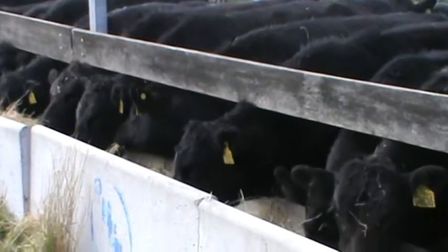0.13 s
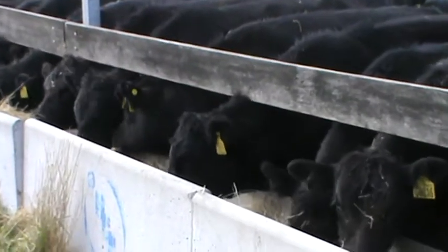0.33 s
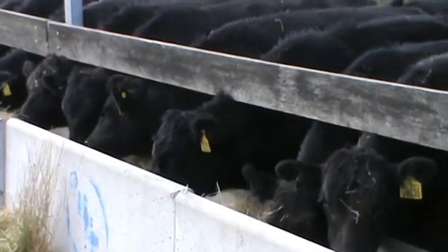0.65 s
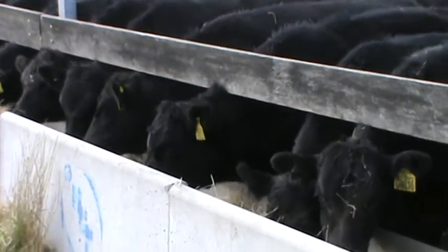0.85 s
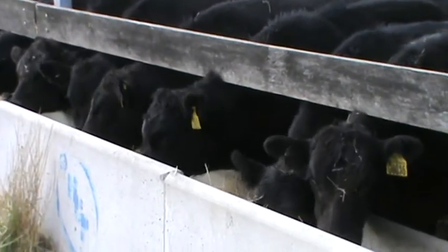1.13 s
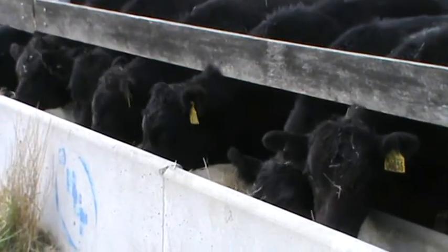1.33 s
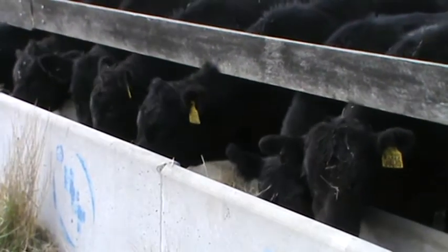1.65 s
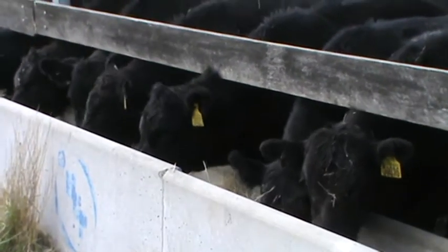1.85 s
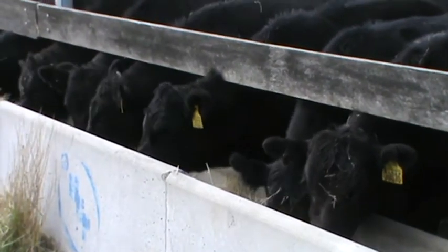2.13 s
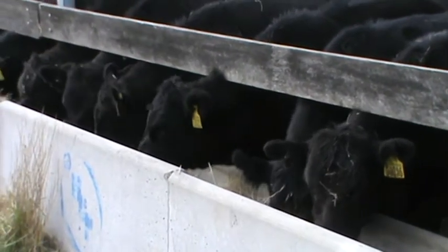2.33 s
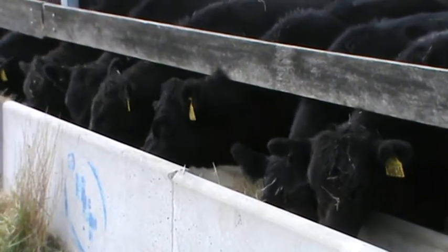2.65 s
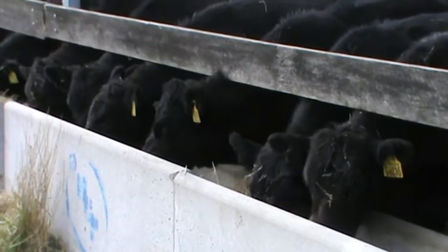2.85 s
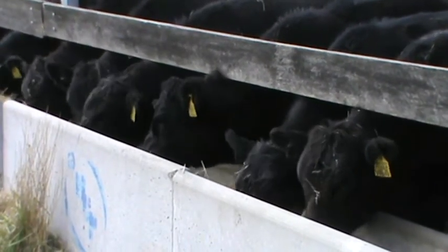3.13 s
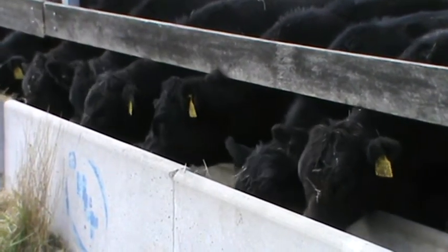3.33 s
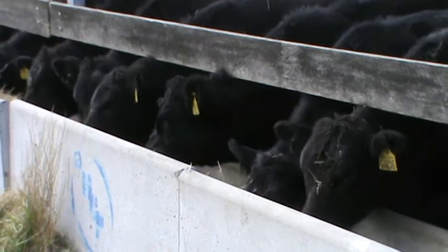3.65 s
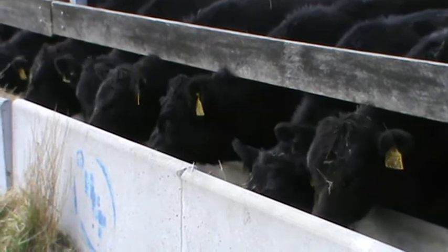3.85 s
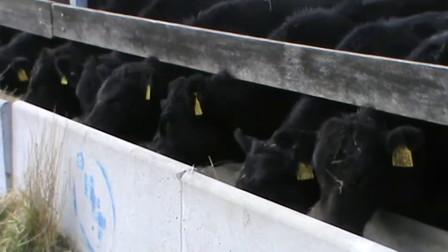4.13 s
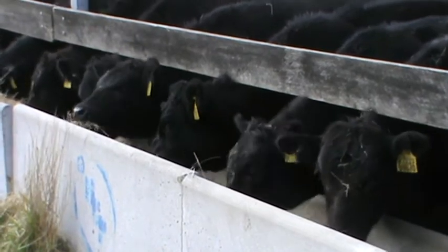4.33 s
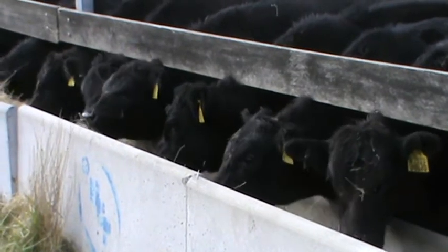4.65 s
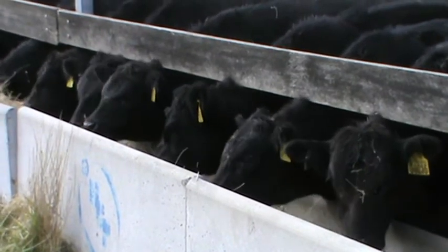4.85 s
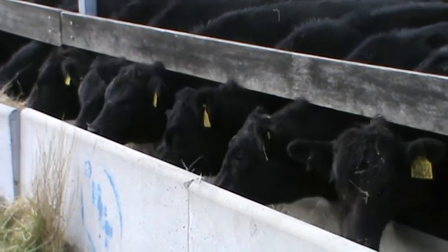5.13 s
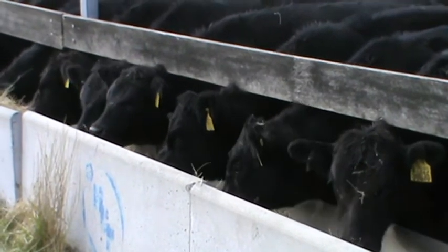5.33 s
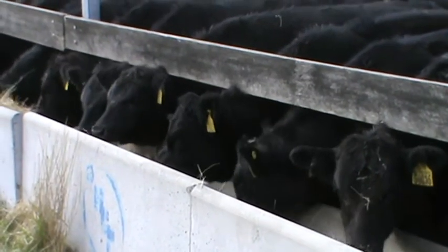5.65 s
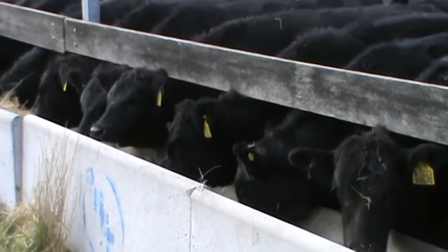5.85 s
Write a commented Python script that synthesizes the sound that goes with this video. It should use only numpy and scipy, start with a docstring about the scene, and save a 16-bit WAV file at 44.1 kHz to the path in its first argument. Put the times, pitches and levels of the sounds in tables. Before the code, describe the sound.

A soft scuffing knock on a concrete trough starts the scene, with a brief faint lens-motor tone stopping by 0.2 s; thin high whine and hiss continue throughout. At 0.24 s a young cow a little to the left begins a low closed-mouth growl, opening around 0.7-0.9 s into a loud, wide bawl that climbs in pitch until about 2 s, then drops quickly by 2.27 s. A second moo overlaps its end, lower, tenser, buzzier and quieter, rising in a strained push near 3.7 s and sagging out by 3.96 s. Farther cattle hum low at 0.9-1.7 s and 2.5-3.4 s. Low gusts buffet the microphone, strongest from 0.9 to 2.4 s, easing after 3.6 s. Dry ticks come at 1.8 s and a sharper knock at 2.7 s. Short scattered echoes follow the calls. From 4 to 6 s, only quiet yard air, faint gusts, small muzzle scuffs, a clearer knock at 5 s and hay rustles.

```python
"""A knock at a concrete feed trough in an open yard, under a thin whine and a lens motor that soon stops.
Then a calf a little to the left swells from a closed-mouth growl to a wide bawl; a buzzier moo follows.
Each moo is a train of fold snaps ringing a moving throat; other cattle low as a few filtered harmonics.
Noise bursts make the scuffs, hay and gusts on the microphone; scattered echoes answer the cattle."""
import sys
import numpy as np
from scipy import signal
from scipy.fft import rfft, irfft, next_fast_len
from scipy.io import wavfile

SR = 44100
rng = np.random.default_rng(int(sys.argv[2]) if len(sys.argv) > 2 else 0)


def dump(signal):
    """Clip the signal to [-1, 1] and save it as 16-bit WAV at the path in sys.argv[1]."""
    limited = np.clip(np.atleast_2d(signal).T, -1, 1)
    pcm = np.round(limited * 32767).astype(np.int16)
    wavfile.write(sys.argv[1], SR, pcm)


N = 264159
T = np.arange(N) / SR


def from_db(db):
    """Decibels to gain."""
    return 10 ** (np.asarray(db) / 20)


def rms_one(x):
    """Scale to an rms of one."""
    return x / np.sqrt(np.mean(x ** 2) + 1e-20)


def at_times(rows, t):
    """Interpolate each column of a time curve at the times t."""
    time_s, *columns = np.transpose(rows)
    return [np.interp(t, time_s, column) for column in columns]


def at_hz(points, hz):
    """Read a spectrum on a log-frequency axis."""
    point_hz, value = np.transpose(points)
    return np.interp(np.log(hz + 1), np.log(point_hz), value)


def band(x, low_hz, high_hz):
    """Causal band-pass."""
    sos = signal.butter(2, [low_hz, high_hz], "band", fs=SR, output="sos")
    return signal.sosfilt(sos, x)


def drift(corner_hz):
    """Low-passed noise with an rms of one."""
    hz = np.fft.rfftfreq(N, 1 / SR)
    spectrum = rfft(rng.standard_normal(N)) / (1 + (hz / corner_hz) ** 2)
    return rms_one(irfft(spectrum, N))


def stereo_noise(spectrum):
    """Coloured noise, rms one, whose left-right correlation varies with frequency."""
    # frequency_hz, left-right correlation (0-1)
    likeness = [(60, 0.41), (130, 0.79), (290, 0.19), (640, 0.37), (1400, 0.17), (3100, 0), (6800, 0.24),
                (12000, 1)]
    size = next_fast_len(N)
    hz = np.fft.rfftfreq(size, 1 / SR)
    mid, side = rfft(rng.standard_normal((2, size)))
    alike = np.clip(at_hz(likeness, hz), -.99, .99)
    both = np.sqrt(1 + alike) * mid + np.sqrt(1 - alike) * side * [[1], [-1]]
    coloured = both * from_db(at_hz(spectrum, hz))
    return rms_one(irfft(coloured, size)[:, :N])


def resonance_power(resonances, hz):
    """Summed power response of resonances; each amplitude is halved at its half width."""
    return sum((from_db(db) / (1 + ((hz - centre_hz) / half_width_hz) ** 2)) ** 2
               for centre_hz, half_width_hz, db in resonances)


def trough():
    """Scuffing knocks and hay are band-passed noise bursts; ticks are filtered impulses."""
    # muzzles and hooves on the trough: start_s, level_db (before the soft onset), centre_hz, t60_s
    knocks = [(.002, -37.5, 1150, 0.19), (0.166, -39, 2600, 0.024), (2.677, -29, 2740, 0.027),
              (4.071, -38, 850, .05), (4.269, -47, 800, 0.045), (4.327, -46, 700, 0.12),
              (4.563, -40, 800, 0.038), (4.648, -41, 784, 0.065), (4.994, -34, 1460, 0.023),
              (5.586, -46, 850, 0.041), (5.883, -38.5, 810, 0.11)]
    # hay pulled about: peak_s, level_db, half_length_s (to 1/e)
    rustles = [(0.474, -58, 0.052), (1.957, -71.5, 0.036), (4.145, -52, 0.014), (4.345, -59, 0.029),
               (4.655, -56, .012), (5.472, -55, .03), (5.89, -54, .015)]
    # sharp dry ticks: start_s, impulse_db (before the filters)
    ticks = [(1.8132, -7.5), (1.821, -17), (2.6785, -20)]
    out = np.zeros((2, N))
    age = T[:SR // 4]
    for start_s, db, hz, t60_s in knocks:
        grit = rng.standard_normal((3, len(age)))
        shared_grit = grit[:2] + grit[2]   # partly alike on both sides
        scuff = rms_one(band(shared_grit, hz / 1.72, hz * 1.34))
        scuff *= from_db(db - 60 * age / t60_s)
        scuff *= 1 - np.exp(-age / (0.027 * t60_s))   # longer scuffs also start more softly
        i = int(start_s * SR)
        out[:, i:i + len(age)] += scuff[:, :N - i]
    pull = sum(from_db(db) * np.exp(-((T - peak_s) / length_s) ** 2) for peak_s, db, length_s in rustles)
    out += pull * rms_one(band(rng.standard_normal((2, N)), 1900, 8100))
    clicks = np.zeros(N)
    for start_s, db in ticks:
        clicks[int(start_s * SR)] = from_db(db)
    return out + band(band(clicks, 6640, 18000), 7300, 17750)


def camera():
    """Microphone hiss, a steady sine whine from the electronics and a lens motor tone that stops."""
    # hiss spectrum: frequency_hz, density_db
    hiss_spectrum = [(100, 1), (3000, -10), (7000, -2), (10000, 2), (12500, 3), (14200, 0), (16000, -1)]
    whine_hz, whine_db, lens_hz, lens_db = 15625, -64.5, 6632, -63.5   # rms levels
    lens_stop_s, hiss_db = 0.167, -60.5
    whine = np.sqrt(2) * from_db(whine_db) * np.sin(2 * np.pi * whine_hz * T)
    lens = np.sqrt(2) * from_db(lens_db) * np.sin(2 * np.pi * lens_hz * T) * (T < lens_stop_s)
    return whine + lens + from_db(hiss_db) * stereo_noise(hiss_spectrum)


def yard_background():
    """Coloured noise at a slowly changing level."""
    # spectrum: frequency_hz, density_db
    yard_spectrum = [(30, -26), (100, -5), (250, 1.5), (400, -5), (650, 1), (1000, -1), (1600, -4),
                     (2500, -8.5), (4000, -13), (6500, -18.5), (11000, -22.5), (15500, -23.5)]
    # time_s, level_db
    yard_level = [(0, -48), (1, -43.5), (3.8, -46), (4.6, -51.5), (5.99, -50.5)]
    return from_db(at_times(yard_level, T)[0]) * stereo_noise(yard_spectrum)


def wind(rumble_db, buffet_db, lump_db, flurry_db, rumble_slope, buffet_slope):
    """Gusts out of a fitful breeze rumble on the ports; harder ones favour a higher buffeting."""
    # air drive between gusts: time_s, drive_db
    breeze_drive = [(0, -64), (.7, -50), (2.55, -39.5), (3.2, -48), (4.2, -69.5), (5.99, -66.5)]
    # gusts on the microphone: peak_s, drive_db, half_length_s (to 1/e)
    gust_drive = [(0.53, -42, 0.034), (0.888, -25, 0.046), (1.588, -24, 0.032), (1.729, -22, 0.077),
                  (2.337, -26.5, 0.024), (2.415, -30, 0.038), (2.787, -34.5, 0.032), (3.084, -36.5, 0.053),
                  (3.574, -41.5, 0.085), (3.98, -51, 0.048), (4.854, -53, 0.033), (5.107, -47, 0.065),
                  (5.376, -49, 0.098)]
    # spectrum of the low rumble: frequency_hz, density_db
    rumble_spectrum = [(20, -11), (45, 1), (80, 0), (130, -2.5), (200, -13.5), (320, -55), (700, -52),
                       (2000, -93)]
    # spectrum of the higher buffeting: frequency_hz, density_db
    buffet_spectrum = [(30, -30), (80, 10.5), (130, 4.5), (220, 8), (330, 0), (500, -14), (900, -6.5),
                       (2500, -74)]
    full_gust_db = -21
    breeze = from_db(at_times(breeze_drive, T)[0] + flurry_db * drift(12))
    gusts = sum(from_db(db) * np.exp(-((T - peak_s) / length_s) ** 2) for peak_s, db, length_s in gust_drive)
    force_db = 20 * np.log10(np.hypot(breeze, gusts)) - full_gust_db
    rumble_gain = from_db(full_gust_db + rumble_db + rumble_slope * force_db)
    buffet_gain = from_db(full_gust_db + buffet_db + buffet_slope * force_db)
    rumble = rumble_gain * stereo_noise(rumble_spectrum)
    buffet = buffet_gain * stereo_noise(buffet_spectrum)
    return from_db(lump_db * drift(21)) * (rumble + buffet)


def effort(t, f0, start_s, end_s, registers, opens_s, swell_s, release_s, easy_hz, strain_db):
    """Register levels in dB: growl fades in, swells to a bawl, drops; semitones above easy_hz add strain."""
    first_snap_s = 0.017   # air already pushes this long before the folds first snap
    held_s = np.maximum(t - opens_s, 0)
    swell = 1 - np.exp(-held_s / swell_s)
    release = np.clip(1 - (end_s - t) / release_s, 0, 1) ** 2
    semitones = 12 * np.log2(np.maximum(f0 / easy_hz, 1))
    age_s = np.maximum(t - start_s, 0) + first_snap_s
    levels = []
    for attack_s, growl_db, bawl_db, change_db_per_s, drop_db in registers:
        attack_db = 20 * np.log10((1 - np.exp(-age_s / attack_s)) ** 2)
        voice_db = growl_db + (bawl_db - growl_db) * swell + change_db_per_s * held_s
        levels.append(attack_db + voice_db + strain_db * semitones - drop_db * release)
    return levels


def jaw_opening(t, half_open_s, opening_s):
    """The jaw drops once, smoothly, and stays down: 0-1."""
    full_bawl = 0.93
    return np.clip(full_bawl * (1 + np.tanh((t - half_open_s) / opening_s)) / 2, 0, 1)


def throat_scale(age_s, f0, hz, rest_hz, pitch_pull, start_shift, settle_s):
    """Resonances shift a little with pitch; the upper ones also settle as the neck stretches out."""
    stretch = start_shift * np.exp(-age_s / settle_s)
    feels_stretch = np.minimum(hz / 2200, 1)   # whole stretch from 2200 Hz up
    return (f0 / rest_hz) ** pitch_pull + stretch * feels_stretch


def causal(gain):
    """Minimum-phase spectra: each response starts sharply and rings out."""
    cepstrum = irfft(np.log(gain + 1e-9))
    half = cepstrum.shape[-1] // 2
    cepstrum[:, 1:half] *= 2
    cepstrum[:, half + 1:] = 0
    return np.exp(rfft(cepstrum))


def from_the_left(x):
    """The camera body shadows and phase-shifts the right port; the mean of both keeps the level of x."""
    # left against right: frequency_hz, left_louder_db
    bearing = [(100, 1.5), (360, 1.5), (700, 9.5), (1100, 13.5), (1450, 7), (2200, 16), (3500, 11.5),
               (4600, 11), (8000, -1.5)]
    # left against right: frequency_hz, left_ahead_rad
    lead = [(300, 0), (1030, -1.1), (1350, -1.4), (2200, 0), (3600, 1.5), (4600, 4)]
    size = next_fast_len(N)
    hz = np.fft.rfftfreq(size, 1 / SR)
    right = from_db(-at_hz(bearing, hz)) * np.exp(-1j * at_hz(lead, hz))
    left = rfft(x, size) * 2 / np.abs(1 + right)
    return irfft(np.array([left, left * right]), size)[:, :N]


def moo(pitch, registers, throat, drive, jaw, neck, jitter_s, shimmer_db, rough, rasp_s, tremor, size=2048):
    """Every snap of the vocal folds rings the throat in the shape that it has at that moment."""
    # closed-mouth resonances: centre_hz, half_width_hz, level_db (relative within a register)
    closed = [(90, 22, -8), (221, 57, 0), (679, 83, -1.5), (947, 65, 11), (1270, 120, -12), (2038, 93, 2.5),
              (2470, 160, -6.5), (3340, 58, -13)]
    # borders of the hum, mouth, buzz and edge registers: frequency_hz
    edges_hz = [0, 450, 1700, 3150, 22000]
    start_s, end_s = pitch[0][0], pitch[-1][0]
    t = T[(T >= start_s) & (T < end_s)]
    cycles = np.cumsum(at_times(pitch, t)[0]) / SR
    snaps_s = np.interp(np.arange(np.ceil(cycles[-1])), cycles, t)
    chance = rng.standard_normal((len(snaps_s), size + 2))
    snaps_s = snaps_s + jitter_s * chance[:, 0]
    when = snaps_s[:, None]
    f0, = at_times(pitch, when)
    levels_db = effort(when, f0, start_s, end_s, registers, **drive)
    opening = jaw_opening(when, **jaw)

    hz = np.fft.rfftfreq(size, 1 / SR)
    scale = throat_scale(when - start_s, f0, hz, **neck)
    scale = scale * (1 + tremor * np.interp(snaps_s, T, drift(11.0)))[:, None]   # never quite still
    power = 0
    for low_hz, high_hz, db in zip(edges_hz, edges_hz[1:], levels_db):
        for shape, share in ((closed, 1 - opening), (throat, opening)):
            register = [row for row in shape if low_hz < row[0] <= high_hz]
            response = resonance_power(register, hz / scale)
            response = response / response.mean(axis=1, keepdims=True)
            power = power + share * from_db(db) ** 2 * SR / f0 * response

    # a puff of turbulence follows each snap
    puff = np.exp(-np.arange(size) / SR / rasp_s)
    source = 1 + rough * rfft(chance[:, 2:] * puff / np.linalg.norm(puff))
    source = source * from_db(shimmer_db * chance[:, 1:2])
    start, fraction = np.divmod(snaps_s * SR, 1)
    delay = np.exp(-2j * np.pi * hz / SR * fraction[:, None])   # part of a sample
    rings = irfft(causal(np.sqrt(power)) * source * delay)
    out = np.zeros(N)
    for i, ring in zip(start.astype(int), rings):
        out[i:i + size] -= ring
    return from_the_left(out)


def first_moo():
    """A closed-mouth growl that opens into a wide bawl."""
    # time_s, pitch_hz
    pitch = [(0.24, 65.8), (0.28, 70.57), (0.64, 95.7), (0.72, 101.7), (0.8, 103.5), (1.0, 114.7),
             (1.08, 116.3), (1.29, 115.4), (1.64, 130.8), (1.84, 132.7), (1.97, 136.5), (2.1, 129.5),
             (2.18, 118.3), (2.27, 89.4)]
    # hum, mouth, buzz, edge: attack_s, growl_db, bawl_db, held_change_db_per_s, release_drop_db
    registers = [(0.3, -39, -28, 0.6, 6.5), (0.07, -43.5, -22, 1.2, 28), (0.071, -43, -29.5, -2, 17.5),
                 (.05, -61.5, -40.5, -7, 11)]
    # open throat: centre_hz, half_width_hz, level_db (relative within a register)
    wide = [(273.4, 18.5, 0), (607, 29.4, -15.5), (688, 10, -11.5), (780, 58, -10), (940, 77, -10.5),
            (1047, 49, 4), (1315, 23, -15.5), (1441, 48, -7.5), (1846, 81, -13.5), (2010, 32, -14.5),
            (2331, 60, -10), (2586, 102, -13), (2950, 85, -20), (3300, 100, -28), (3747, 94, -31),
            (4530, 450, -53.5)]
    drive = dict(opens_s=0.67, swell_s=0.14, release_s=0.11, easy_hz=118.7, strain_db=0.0)
    jaw = dict(half_open_s=0.85, opening_s=0.11)
    neck = dict(rest_hz=129.2, pitch_pull=0.11, start_shift=0.2, settle_s=0.18)
    return moo(pitch, registers, wide, drive, jaw, neck,
               jitter_s=2e-5, shimmer_db=0.53, rough=0.24, rasp_s=0.018, tremor=0.011)


def yard_echo(x, t60_s, first_s, wet_db):
    """Scattered reflections from trough, fence and sheds, different on each side."""
    age = T[:SR]
    tail = rng.standard_normal((2, SR)) * from_db(-60 * age / t60_s) * (age > first_s)
    tail /= np.linalg.norm(tail, axis=1, keepdims=True)
    return from_db(wet_db) * signal.oaconvolve(x.mean(axis=0)[None], tail, axes=1)[:, :N]


def lowing(curve, muzzle, waver, count=7):
    """A few wavering harmonics through a closed muzzle."""
    f0, db = at_times(curve, T)
    phase = 2 * np.pi * np.cumsum(f0 * (1 + waver * drift(42.4))) / SR
    orders = np.arange(1, count + 1)[:, None]
    power = resonance_power(muzzle, orders * f0)
    amplitudes = np.sqrt(2 * power / power.sum(axis=0))
    tone = (amplitudes * np.sin(orders * phase)).sum(axis=0)
    return tone * from_db(db) * ((T > curve[0][0]) & (T < curve[-1][0]))


def herd_lowing():
    """Two farther lows, each with its own pitch curve and muzzle resonances."""
    # time_s, pitch_hz, level_db
    low_1 = [(.85, 118.5, -49), (.92, 123, -24), (1.0, 130.9, -24), (1.07, 140, -30), (1.12, 157.5, -35),
             (1.25, 177.5, -32), (1.48, 193.3, -28), (1.6, 181, -33), (1.75, 164.2, -38)]
    # time_s, pitch_hz, level_db
    low_2 = [(2.5, 114.2, -45), (2.62, 122, -36.5), (2.75, 127.7, -34), (2.87, 131.5, -30),
             (3.0, 132.9, -26.5), (3.15, 133, -29), (3.3, 132.4, -29), (3.37, 120.6, -43), (3.44, 125, -44)]
    # muzzle of the first: centre_hz, half_width_hz, relative_level_db
    muzzle_1 = [(237, 20.3, -19.5), (740, 56, -39)]
    # muzzle of the second: centre_hz, half_width_hz, relative_level_db
    muzzle_2 = [(274.4, 21.4, 1), (650, 42, -20.5), (765, 43, -11.5)]
    return lowing(low_1, muzzle_1, waver=0.01) + lowing(low_2, muzzle_2, waver=0.0028)


def second_moo():
    """A tenser, buzzier call, open-mouthed almost from the start, with a last strained push."""
    # time_s, pitch_hz
    pitch = [(2.25, 95.2), (2.282, 95.84), (2.526, 99.2), (3.058, 105.8), (3.412, 103.1), (3.496, 104.5),
             (3.692, 116.4), (3.788, 114.9), (3.83, 111.2), (3.906, 84.2), (3.96, 65.2)]
    # hum, mouth, buzz, edge: attack_s, growl_db, bawl_db, held_change_db_per_s, release_drop_db
    registers = [(0.0301, -38, -38.5, -3, 7.5), (0.04, -38.5, -33, -0.13, 15.4),
                 (0.026, -44.5, -37, 1.5, 33), (0.029, -66, -46, 2.3, 46.4)]
    # tense throat: centre_hz, half_width_hz, level_db (relative within a register)
    tense = [(199.3, 23, -3.5), (324.2, 25.5, -1.5), (676, 64, -3), (801, 14.7, -3), (1063, 58, 7.5),
             (1200, 81, -2), (1504, 57, 1.5), (1800, 142, -20), (2124, 55, -1.5), (2400, 59, -6),
             (2760, 160, -6.5), (3000, 86, -7), (3382, 110, -2.5), (3830, 200, -17.5), (4010, 34, -4.5),
             (4480, 54, -12.5), (5818, 1700, -32), (9700, 390, -44)]
    drive = dict(opens_s=2.43, swell_s=0.16, release_s=.13, easy_hz=106, strain_db=1)
    jaw = dict(half_open_s=2.06, opening_s=.15)
    neck = dict(rest_hz=115.6, pitch_pull=-0.13, start_shift=-0.028, settle_s=0.22)
    return moo(pitch, registers, tense, drive, jaw, neck,
               jitter_s=8e-6, shimmer_db=-0.28, rough=0.24, rasp_s=0.0049, tremor=0.009)


def scene():
    """Trough, camera, yard and wind around two near moos, the herd and their echo."""
    background = yard_background()
    gusts = wind(rumble_db=-3.5, buffet_db=0.0, lump_db=0.4, flurry_db=2.5, rumble_slope=0.81, buffet_slope=1.24)
    cattle = first_moo() + second_moo() + herd_lowing()
    echo = yard_echo(cattle, t60_s=0.3, first_s=0.0076, wet_db=-14.5)
    return trough() + camera() + background + gusts + cattle + echo


def record(dry):
    """A steep elliptic low-pass cuts the top."""
    cutoff_hz = 15900
    return signal.sosfilt(signal.ellip(12, .1, 80, cutoff_hz, fs=SR, output="sos"), dry)


dry = scene()
out = record(dry)
dump(out)
```